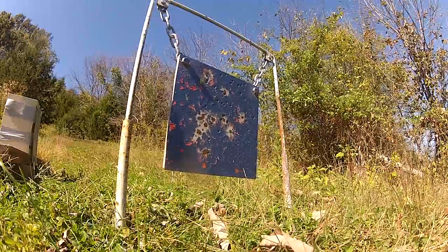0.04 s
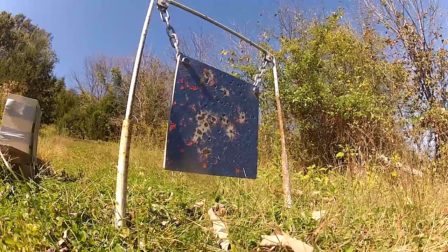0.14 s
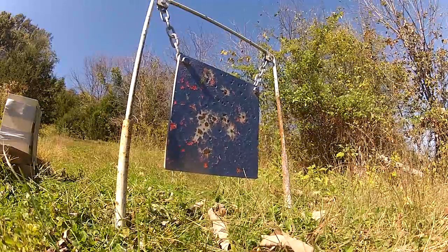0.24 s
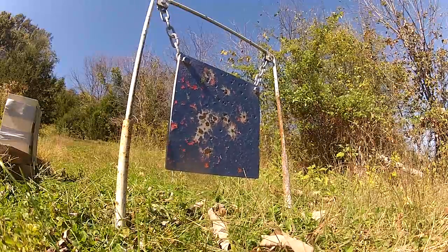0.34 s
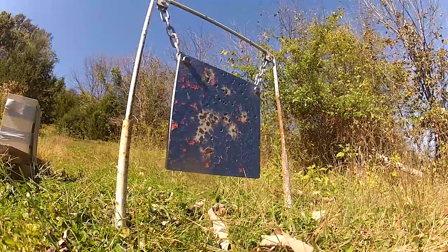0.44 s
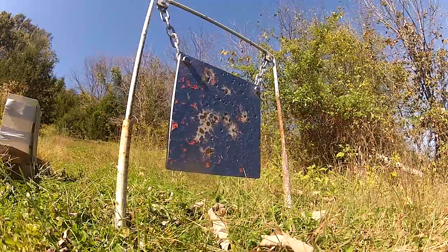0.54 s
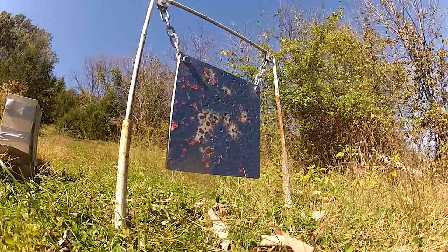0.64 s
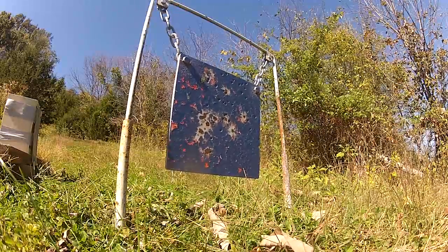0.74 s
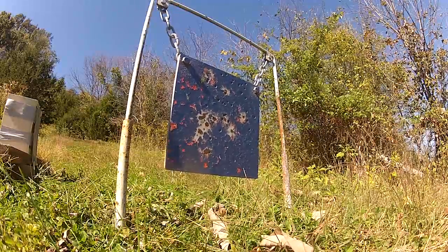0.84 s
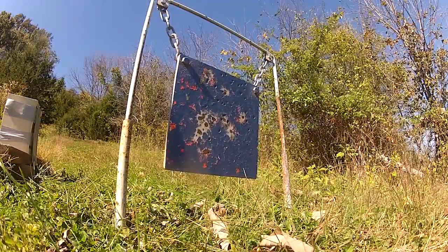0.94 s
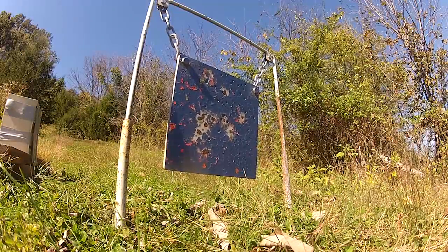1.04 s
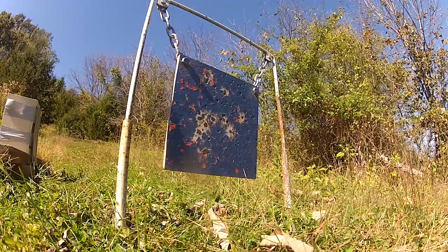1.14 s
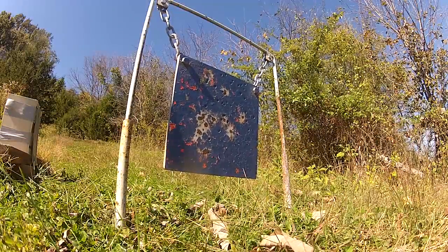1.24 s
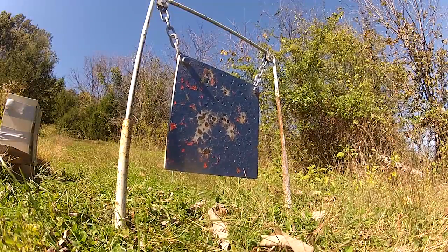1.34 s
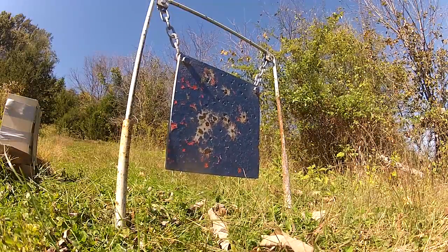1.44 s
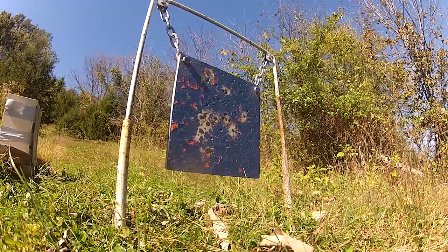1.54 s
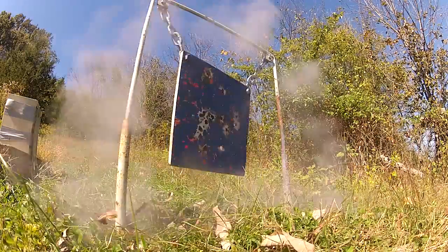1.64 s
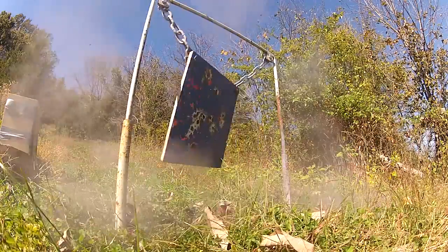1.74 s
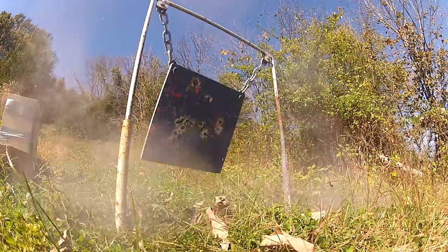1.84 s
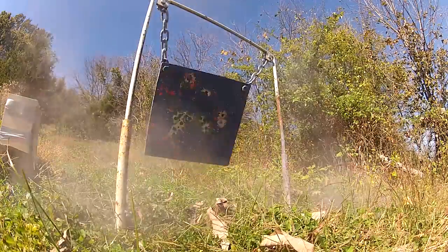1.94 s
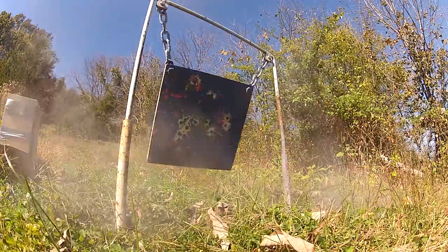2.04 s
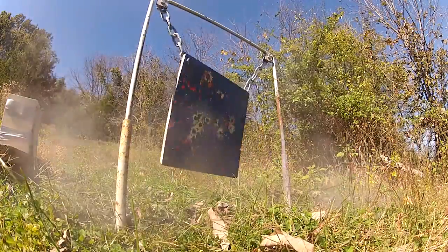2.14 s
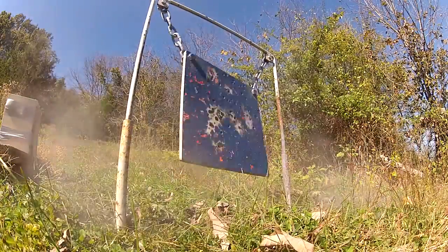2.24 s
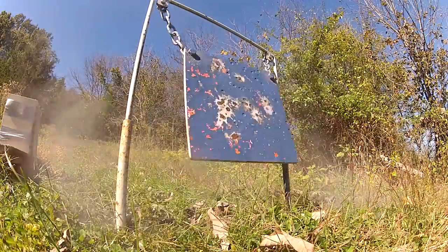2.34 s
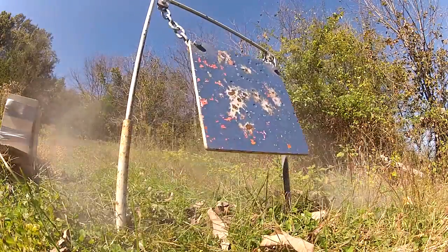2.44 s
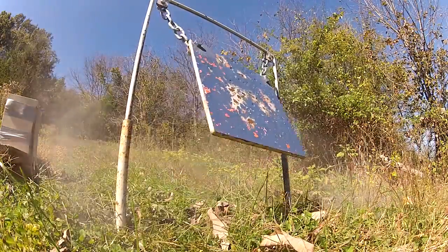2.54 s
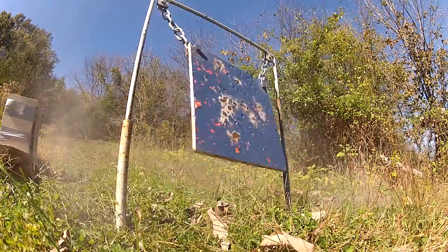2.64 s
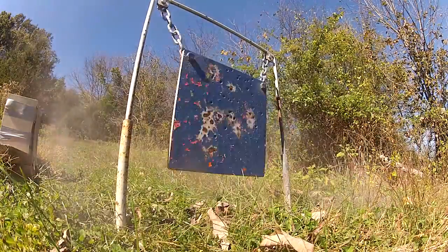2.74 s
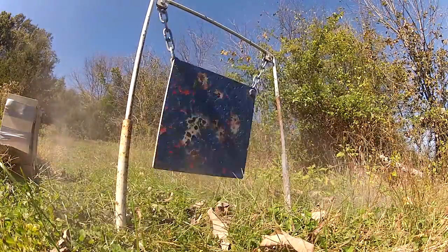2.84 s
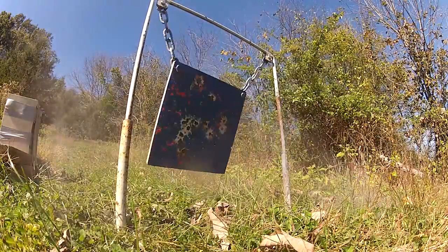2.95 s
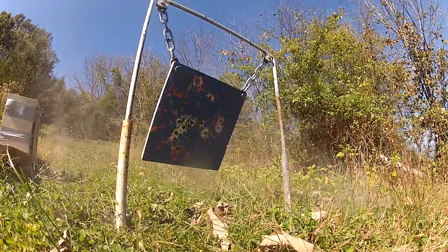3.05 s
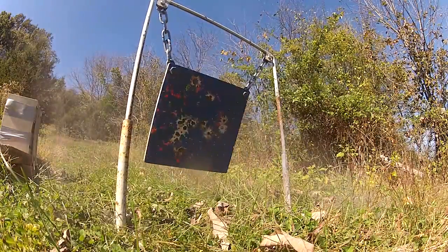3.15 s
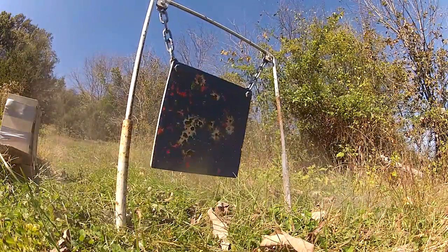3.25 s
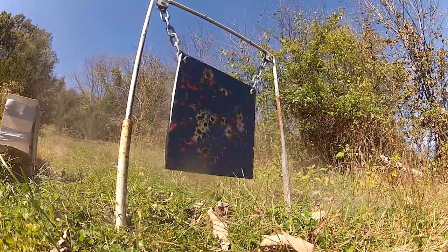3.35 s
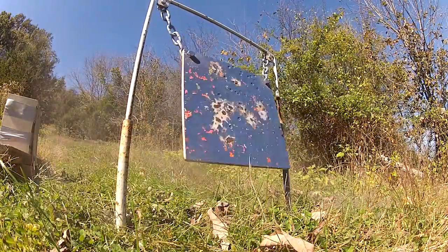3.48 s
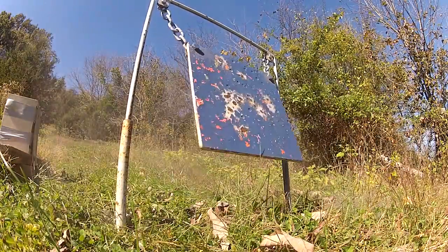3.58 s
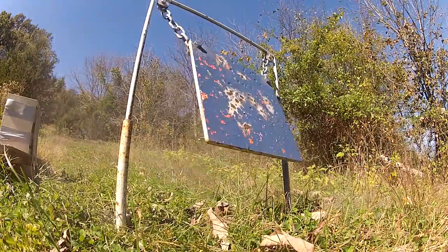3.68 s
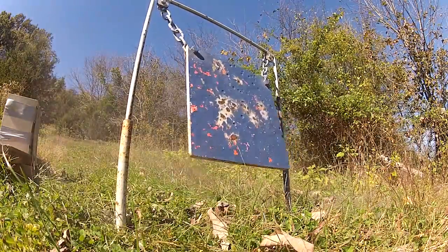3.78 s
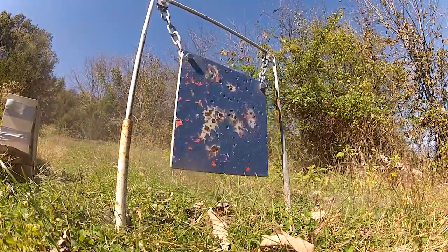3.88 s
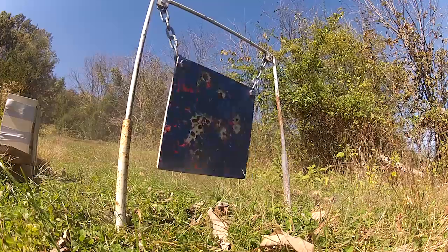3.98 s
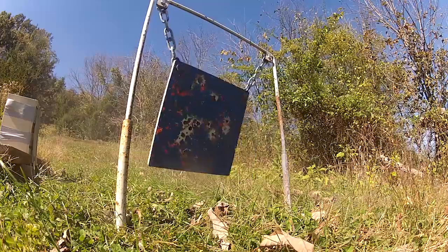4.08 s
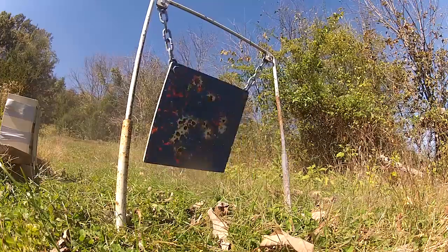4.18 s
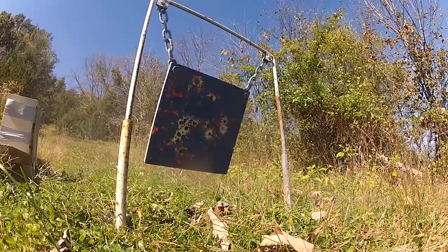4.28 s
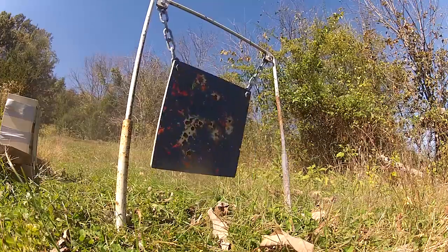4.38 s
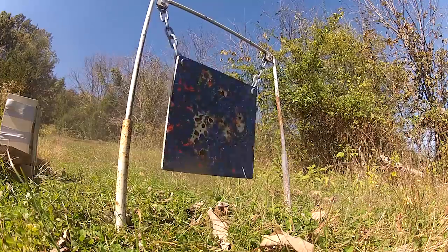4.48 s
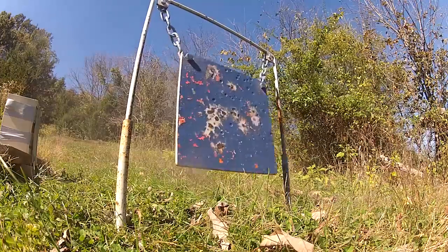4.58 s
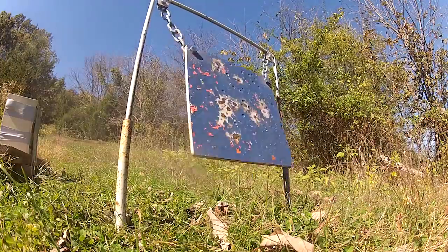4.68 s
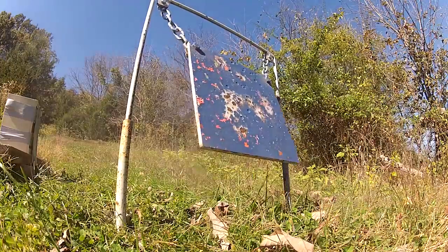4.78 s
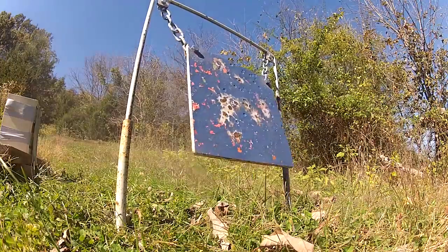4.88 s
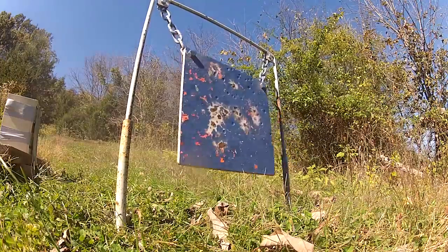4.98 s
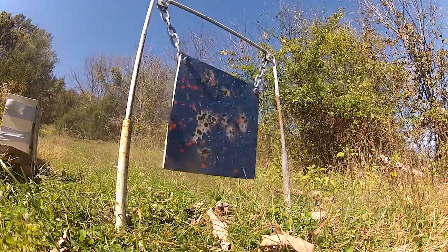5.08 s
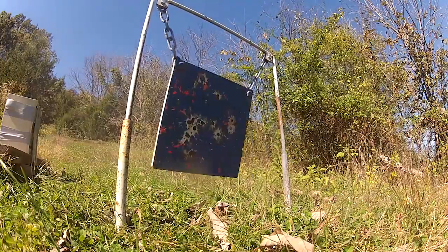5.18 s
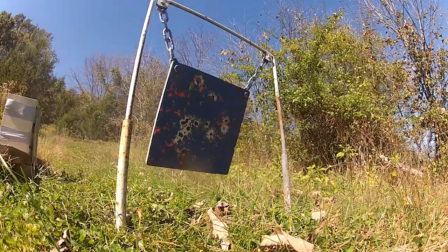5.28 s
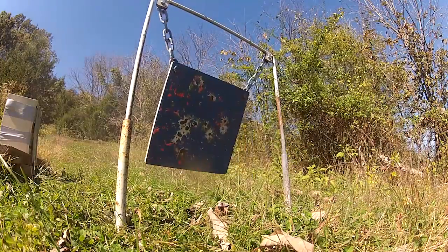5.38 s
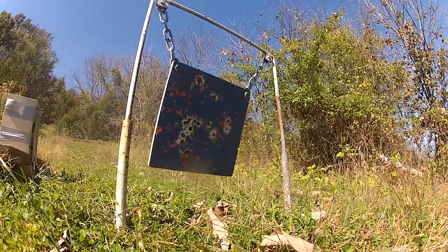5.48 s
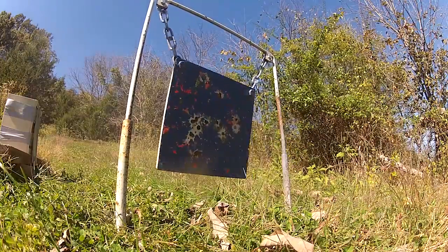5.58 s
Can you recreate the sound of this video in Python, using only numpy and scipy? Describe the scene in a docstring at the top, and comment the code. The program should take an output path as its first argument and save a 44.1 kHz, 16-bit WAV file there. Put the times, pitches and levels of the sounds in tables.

```python
"""Rifle shot on a hanging steel plate

A bullet splashes on a steel plate chained up in a meadow, and the clang ducks the limiter of a small
camera close by. The far muzzle blast lands after the bullet; both roll back from the trees as the gain
recovers. Debris patters into the grass and the plate swings on, its chains rattling, then clinking
at the turns."""
import sys
import numpy as np
from scipy import signal
from scipy.fft import rfft, irfft
from scipy.io import wavfile
from scipy.ndimage import uniform_filter1d

SR = 44100
rng = np.random.default_rng(int(sys.argv[2]) if len(sys.argv) > 2 else 0)


def output_pcm(signal):
    """Save a mono or channel-first signal as 16-bit PCM at the path in sys.argv[1].

    Samples are clipped to [-1, 1] before scaling.
    """
    pcm = np.clip(np.atleast_2d(signal).T, -1, 1) * 32767
    wavfile.write(sys.argv[1], SR, np.round(pcm).astype(np.int16))


N = 247842
TIME = np.arange(N) / SR
HIT_S, BLAST_S = 1.715, 1.8724

# plate modes: f/Hz, level/dB, t60/s, t/s when a null of the beam faces the camera, level/dB in that null
PLATE_MODES = [(519.6, -3.5, 1.63, 1.81, -8), (590, 10, 0.19, 1.8, -4.5), (1584, 0.5, .48, 1.95, -16.5),
               (1771, -1.5, .5, 2.0, -13), (1981, 9, .2, 1.6, -3), (2368, 10, 0.19, 1.95, -4),
               (2666, 24, .23, 1.85, -11), (2972, 26, 0.38, 2.2, -23.5), (3082, -1, .33, 1.96, -9.5),
               (3370, 8, 0.28, 1.96, -7), (3790, 7, 0.27, 2.7, -9), (4034, 22, 0.39, 1.975, -20),
               (4227, 17, 0.17, 0.8, -6.5), (4958, -0.5, .35, 1.97, -1), (5350, 4.5, 0.34, 1.98, -8.5),
               (5998, 7, .2, 1.97, -1.5)]
# the plate's treble as its face turns away: t/s, level/dB
PLATE_FACING = [(1.715, 0.5), (1.93, 0), (1.965, -12), (2.05, -8.5), (2.4, -6)]
# tone colour of the shattering bullet: f/Hz, level/dB
SPLASH_SPECTRUM = [(15, -12.5), (30, 5), (60, 8), (150, 3.5), (350, 4), (600, 0.5), (1000, -3.5),
                   (1400, -4), (2500, -4), (4200, -6), (5500, -8)]
# low pressure swings under the hit: f/Hz, level/dB, t60/s
SHOVE_TONES = [(51.4, 28, 0.056), (252, 30.5, .014)]
# tone colour of the blast rolling through the woods: f/Hz, level/dB
ROLL_SPECTRUM = [(18, -38), (30, -25.5), (75, -6), (193, 0.5), (266, -0.5), (417, -10.5), (563, -11),
                 (713, -12), (1090, -37.5), (2260, -32.5), (2870, -38), (3060, -36), (3550, -61),
                 (5000, -59), (6500, -75), (11000, -120)]
# returns from trees and far slopes, the farthest dullest: t/s, level/dB, attack/s, t60/s, cutoff f/Hz
WOODS_ECHOES = [(2.055, -21, .025, .22, 4000), (2.21, -19, .02, .45, 4000), (2.37, -28, .025, .6, 4000),
                (2.59, -33, .025, 2.7, 4000), (3.24, -41, .38, 3.8, 900)]
# tone colour of the clang's echo: f/Hz, level/dB
TREE_SPECTRUM = [(60, -25), (250, -12), (600, -8), (1100, -16), (1600, 10), (2100, -2), (3000, 1.5),
                 (4200, 0.5), (5500, -2)]
# modes of the chains with the frame and plate they bear on: f/Hz, level/dB, t60/s
CHAIN_MODES = [(578, 1, 0.14), (638, -5.5, 0.048), (865.5, -11.5, 0.11), (1560, 1, 0.16), (1835, -2, 0.057),
               (2336, -6, 0.09), (2605, 1.5, 0.14), (3170, -6, 0.055), (3330, -5, 0.075),
               (3990, -5.5, 0.093), (4440, -8.5, 0.027), (5085, -6.5, 0.036), (5320, -14, 0.14)]
# slipping links: t/s, link ring level/dB, frame knock level/dB, gritty tick level/dB, pitch f/Hz
LINK_SLIPS = [(2.0734, -25, -12, -25.5, 4500), (2.2164, -27, -12, -26, 2100), (2.3486, -33, -38, -39, 2600),
              (2.384, -28, -24, -29, 2500), (2.3989, -29, -26, -25, 2500), (2.4433, -42, -33, -32, 1700),
              (2.4708, -39, -30, -37, 2500), (2.4992, -32, -28, -34, 2050), (2.5294, -33, -37, -33, 2000),
              (2.5914, -46, -31, -43, 1800), (2.6369, -46, -33, -39, 2500), (2.7307, -43, -42, -38, 1900),
              (2.7856, -42, -38, -42, 2700), (2.8025, -38.5, -30, -46, 2600), (2.8679, -47, -37, -41, 2500),
              (2.9926, -49, -37, -46, 2050), (3.0315, -51, -50, -45, 3000), (3.052, -46, -39, -44, 4400),
              (3.0652, -57, -37, -51, 4400), (3.1103, -37, -40, -40, 4700), (3.2314, -59, -41, -61, 4500),
              (3.5224, -48, -46, -43, 1900), (3.5448, -38.5, -58, -46, 2600),
              (3.6524, -69, -42.5, -67, 1800), (3.7234, -48, -48, -43, 2000), (3.8467, -62, -51, -55, 2000),
              (4.1225, -55, -39.5, -52, 2100), (4.1819, -56, -46, -50, 3700), (4.2043, -40, -51, -40, 4400),
              (4.3765, -52, -40, -57, 4400), (4.5196, -52, -43.5, -52, 3200), (4.56, -57, -47, -54, 2900),
              (4.6922, -44, -48.5, -53, 2600), (5.0404, -60, -55, -57, 3300), (5.0775, -45, -38, -48, 1550),
              (5.1217, -54, -37, -52, 2000), (5.1567, -51, -43.5, -49, 1950),
              (5.2051, -61, -48.5, -57, 2200), (5.2814, -61, -60, -58, 2400)]
# tone colour of a link's gritty tick: f/Hz, level/dB
GRIT_SPECTRUM = [(300, -28), (700, -9), (1150, -13.5), (1700, 8), (2800, 6.5), (3700, -1), (5500, -2.5)]
# tone colour of the outdoor air: f/Hz, level/dB
MEADOW_SPECTRUM = [(15, -36.5), (25, -7.5), (65, -10.5), (101, -0.5), (124, -10.5), (199, -9), (343, -14.5),
                   (392, -17), (449, -16), (492, -19), (563, -21), (1520, -33.5), (2440, -31), (5500, -37),
                   (7150, -48), (12100, -120)]


def plate(lobe_cycles=750, waver_db=4.5, waver_radians=0.62):
    """The clang: the swing sweeps each mode's beam past the camera, higher modes in narrower lobes."""
    t = np.maximum(TIME - HIT_S, 0)
    facing = envelope(PLATE_FACING)
    tug = np.clip((t - .2) / 0.067, 0, 1)  # the chains snap taut and make the ring waver
    out = np.zeros(N)
    for hz, db, t60, null_s, null_db in PLATE_MODES:
        lobes = np.sin(np.pi * (TIME - null_s) * hz / lobe_cycles)
        beam = np.hypot(lobes, undb(null_db)) / np.hypot(1, undb(null_db))
        aim = facing ** np.clip(np.log2(hz / 1000), 0, 1)  # low modes spread all round
        tone = np.sin(2 * np.pi * hz * t + waver_radians * tug * walk(20))
        out += undb(db + waver_db * tug * walk(22)) * beam * aim * fade(t, t60) * tone
    return out


def bullet_splash(burst_db=31.5, attack_s=.008):
    """The bullet shatters on the steel in a burst of noise, trailed by a faint spray of fragments."""
    burst = undb(burst_db) * swell(HIT_S, attack_s, t60=.048, hold_s=.004)
    spray = swell(HIT_S, attack_s, t60=.34)
    return noise(SPLASH_SPECTRUM) * np.hypot(burst, spray)


def air_shove():
    """The punch under the clang: air pushed aside by the arriving bullet and the recoiling plate."""
    t = np.maximum(TIME - HIT_S, 0)
    return -sum(undb(db) * fade(t, t60) * np.sin(2 * np.pi * hz * t) for hz, db, t60 in SHOVE_TONES)


def muzzle_blast(hz=205, width_s=0.0026, thump_db=15, rumble_db=-22.5, patchy_db=1.75):
    """The distant rifle: one dull thump, then its long, uneven rumble and echoes among the woods."""
    t = TIME - BLAST_S
    thump = -np.sin(2 * np.pi * hz * (t - .0004)) * np.exp(-(t / width_s) ** 2)
    roll = undb(rumble_db) * swell(BLAST_S, width_s, t60=2.85) * noise(ROLL_SPECTRUM)
    for s, level_db, attack_s, t60, cutoff_hz in WOODS_ECHOES:
        dulled = signal.lfilter(*signal.butter(1, cutoff_hz, fs=SR), noise(ROLL_SPECTRUM))
        roll += undb(level_db) * swell(s, attack_s, t60) * dulled
    return undb(thump_db) * thump + roll * undb(patchy_db * walk(45))


def tree_echo(burst, ring, echo_db=-53, ring_db=-2.5, growth_db=-24):
    """The tree line returns the clang in one swell; nearer and deeper growth scatters a long, weak tail."""
    tree_line = swell(start_s=.345, attack_s=.085, t60=.45)
    growth = undb(growth_db) * swell(start_s=.06, attack_s=.33, t60=2.8)
    response = noise(TREE_SPECTRUM) * np.hypot(tree_line, growth)
    send = burst + undb(ring_db) * ring
    return undb(echo_db) * signal.fftconvolve(send, response / np.linalg.norm(response))[:N]


def chain_clinks():
    """Single slips as the swinging plate loads and unloads its chains."""
    out = np.zeros(N)
    for s, ring_db, knock_db, tick_db, pitch_hz in LINK_SLIPS:
        add(out, s, clink(ring_db, knock_db, tick_db, pitch_hz))
    return out


def chain_rattle(start_s=1.87, jolt_db=-33.5, jolt_per_s=150, swing_db=-72, swing_per_s=8):
    """The jolt shakes the chains, ever softer and sparser; the swing keeps a few faint contacts going."""
    jolt = swell(start_s, attack_s=.22, t60=1.6)
    rate = np.maximum(jolt_per_s * jolt ** .25, swing_per_s * (TIME > start_s))
    level_db = 20 * np.log10(undb(jolt_db) * jolt + undb(swing_db))
    out = np.zeros(N)
    for s, hz, size_db in contacts(rate, low_hz=1500, high_hz=4600, scatter_db=3):
        db = level_db[int(s * SR)] + size_db
        add(out, s, clink(ring_db=db, knock_db=db + 10, tick_db=db - 1, pitch_hz=hz))
    return out


def clink(ring_db, knock_db, tick_db, pitch_hz, detune=0.0084, rise_s=0.0011, tick_follow=0.91):
    """A link slips and seats: a gritty tick and ringing modes, both coloured by where it bears."""
    size = SR // 5
    t = np.arange(size) / SR
    hz, db, t60 = np.transpose(CHAIN_MODES)[:, :, None]
    gain = undb(db + slip_drive(hz, ring_db, knock_db, pitch_hz))
    # the load on the links shifts and damps the modes
    hz = hz * (1 + detune * rng.standard_normal(hz.shape))
    t60 = t60 * rng.uniform(0.7, 1, t60.shape)
    ring = gain * fade(t, t60) * np.sin(2 * np.pi * (hz * t + rng.random(hz.shape)))
    grit_hz, grit_db = np.transpose(GRIT_SPECTRUM)
    grit_db = grit_db + tick_follow * slip_drive(grit_hz, ring_db, knock_db, pitch_hz)
    grit = noise(np.column_stack([grit_hz, grit_db]), size=size)
    tick = undb(tick_db) * grit * fade(t, t60=0.045)
    return (ring.sum(0) + tick) * (1 - np.exp(-t / rise_s))


def slip_drive(hz, ring_db, knock_db, pitch_hz, frame_hz=580, links_hz=1560):
    """Drive in dB: a slip knocks the frame's lows and rings the links' highs, most near its own pitch."""
    off_pitch_db = np.minimum(18 * np.abs(np.log2(hz / pitch_hz)), 13)  # 18 dB an octave, 13 dB deep
    link_share = np.clip(np.log(hz / frame_hz) / np.log(links_hz / frame_hz), 0, 1) ** 2
    return (1 - link_share) * knock_db + link_share * (ring_db - off_pitch_db)


def debris(start_s=1.87, grains_per_s=2000, grain_db=-30, fall_db_per_s=27):
    """Dirt and fragments patter into dry grass, one tiny pitched tick each, the heavy grains first."""
    rate = grains_per_s * swell(start_s, attack_s=.27, t60=2.4)
    t = np.arange(SR // 50) / SR
    out = np.zeros(N)
    for s, hz, size_db in contacts(rate, low_hz=1800, high_hz=4600, scatter_db=3):
        db = grain_db - fall_db_per_s * (s - start_s) + size_db
        add(out, s, undb(db) * fade(t, t60=0.0085) * np.sin(2 * np.pi * hz * t))
    return out


def meadow(level_db=-55.5, drift_db=-0.54):
    """A bed of quiet outdoor air with a low distant rumble, swelling slightly."""
    return noise(MEADOW_SPECTRUM) * undb(level_db + drift_db * walk(2.4))


def undb(db):
    """Decibels to gain."""
    return 10 ** (np.asarray(db) / 20)


def fade(t, t60):
    """Exponential decay that loses 60 dB in t60 seconds."""
    return np.exp(-np.log(1000) * t / t60)


def swell(start_s, attack_s, t60, hold_s=0):
    """Gain over time: a straight attack to 1, a hold, an exponential release."""
    t = TIME - start_s
    return np.clip(t / attack_s, 0, 1) * fade(np.maximum(t - attack_s - hold_s, 0), t60)


def envelope(rows):
    """A fader ride through (t/s, level/dB) points, silent before the first."""
    s, db = np.transpose(rows)
    return undb(np.interp(TIME, s, db)) * (TIME >= s[0])


def walk(rate):
    """Random modulation: values joined by lines, rate of them a second."""
    knots = np.arange(0, TIME[-1] + 1, 1 / rate)
    return np.interp(TIME, knots, rng.standard_normal(len(knots)))


def noise(colour, size=N):
    """Noise of rms 1, coloured by (f/Hz, level/dB) points."""
    hz, db = np.transpose(colour)
    f = np.maximum(np.arange(size // 2 + 1) * SR / size, 1)
    gain = undb(np.interp(np.log(f), np.log(hz), db))
    x = irfft(rfft(rng.standard_normal(size)) * gain, size)
    return x / x.std()


def contacts(rate, low_hz, high_hz, scatter_db, count=3000):
    """Random contacts at a moving rate per second: rows of t/s, f/Hz, level/dB."""
    due = np.cumsum(rng.exponential(size=count))
    expected = np.cumsum(rate) / SR
    hz = low_hz * (high_hz / low_hz) ** rng.random(count)
    size_db = scatter_db * rng.standard_normal(count)
    rows = np.column_stack([np.interp(due, expected, TIME), hz, size_db])
    return rows[due < expected[-1]]


def add(track, s, sound):
    """Mix a sound into a track at time s."""
    i = int(s * SR)
    track[i:i + len(sound)] += sound[:max(N - i, 0)]


def scene():
    """All layers meet at one microphone; both channels carry it."""
    burst, ring = bullet_splash(), plate()
    shot = burst + ring + air_shove() + tree_echo(burst, ring) + muzzle_blast()
    mono = shot + meadow() + debris() + chain_clinks() + chain_rattle()
    return np.array([mono, mono])


def limiter(x, threshold_db=-5.5, release_db_per_s=90, window_s=0.0065):
    """The gain ducks at once under a loud sound and climbs back at a steady rate."""
    power = uniform_filter1d(np.mean(x ** 2, axis=0), int(window_s * SR))
    over_db = 10 * np.log10(np.maximum(power / undb(threshold_db) ** 2, 1))
    climb_db = release_db_per_s * TIME
    return x * undb(climb_db - np.maximum.accumulate(over_db + climb_db))


def record(dry):
    """The camera limits, holds samples, which mirrors every ring into a bright treble, and clips."""
    band_hz, hold_hz, top_hz, ceiling = 5500, 12000, 15600, .78
    dulled = signal.sosfilt(signal.butter(4, band_hz, fs=SR, output="sos"), limiter(dry))
    low_rate = signal.resample_poly(dulled, hold_hz, SR, axis=1, window=("kaiser", 3))
    held = signal.resample_poly(np.repeat(low_rate, 4, axis=1), SR, 4 * hold_hz, axis=1)[:, :N]
    high_cut = signal.ellip(8, .1, 60, top_hz, fs=SR, output="sos")
    return signal.sosfiltfilt(high_cut, np.clip(held, -ceiling, ceiling))


dry = scene()
out = record(dry)
output_pcm(out)
```